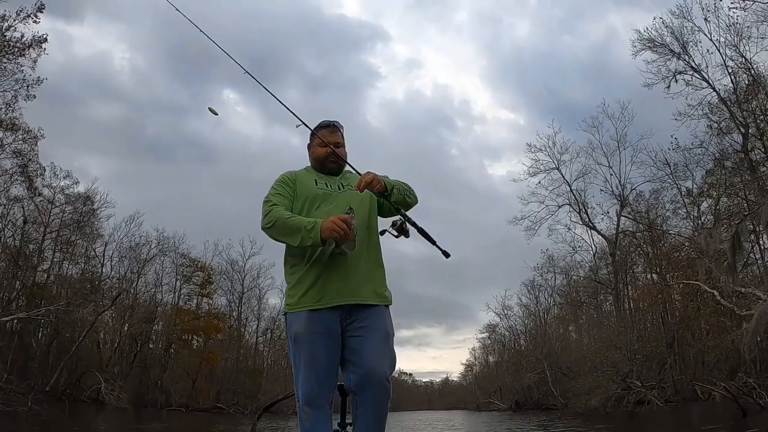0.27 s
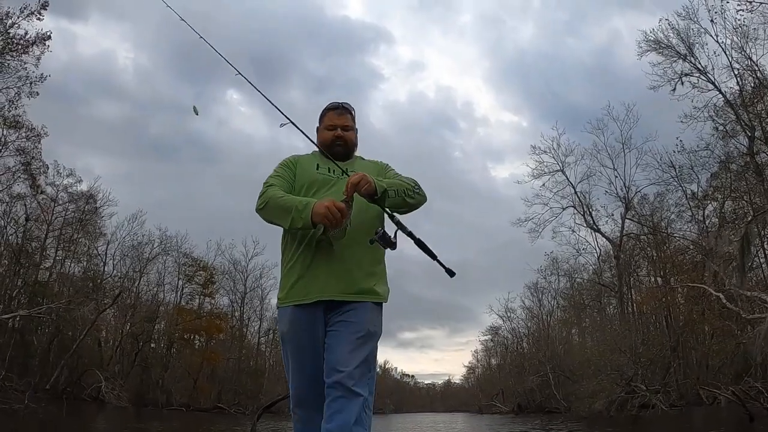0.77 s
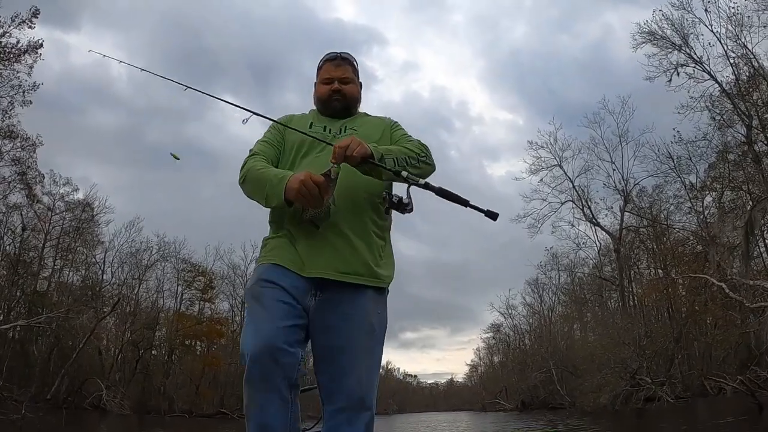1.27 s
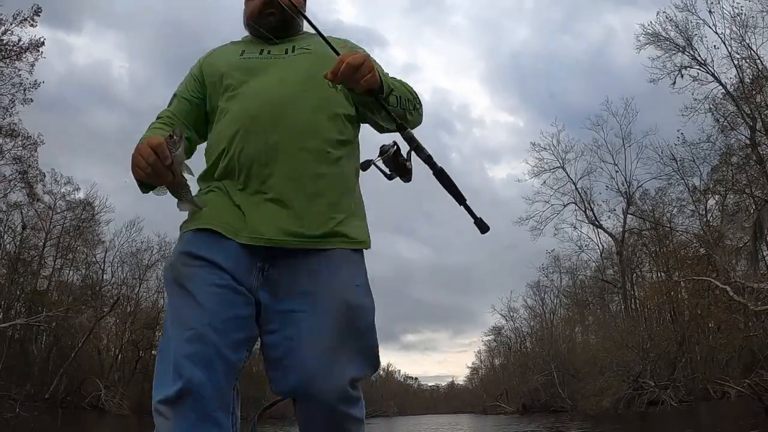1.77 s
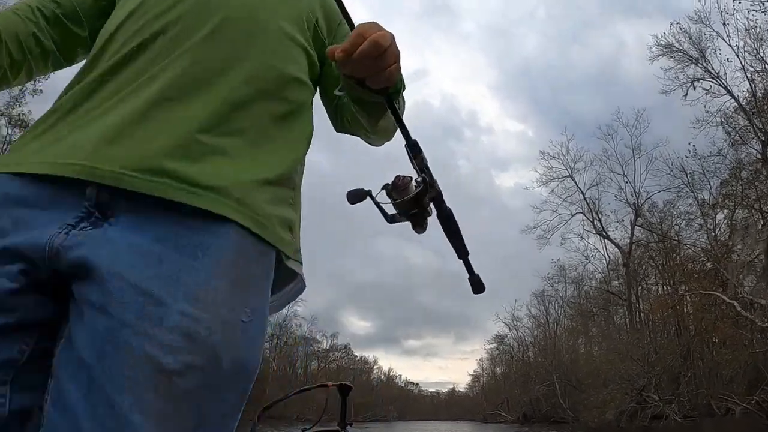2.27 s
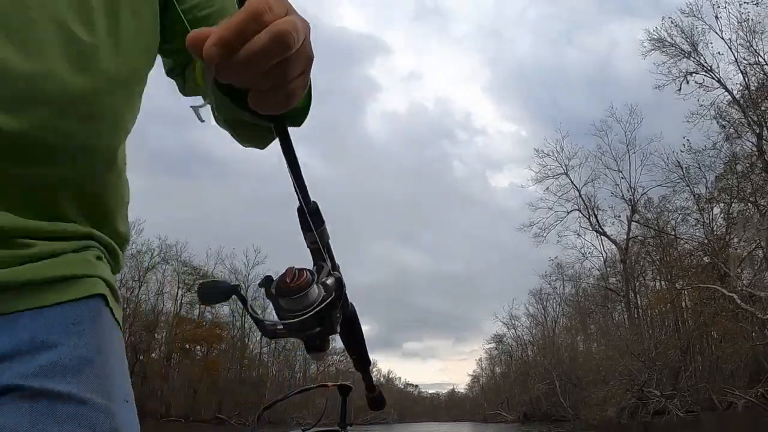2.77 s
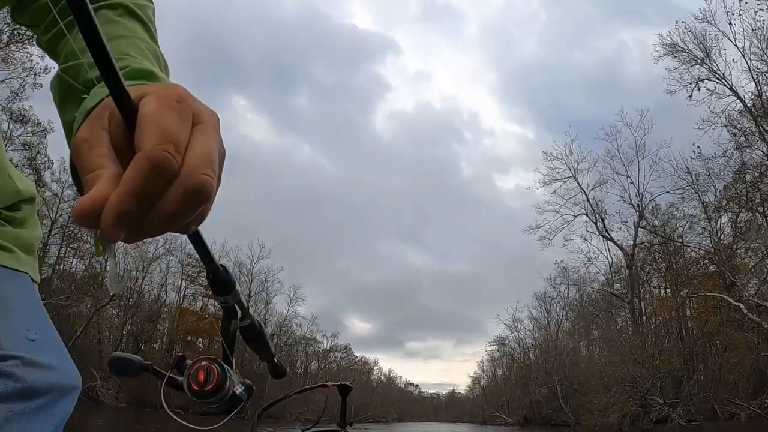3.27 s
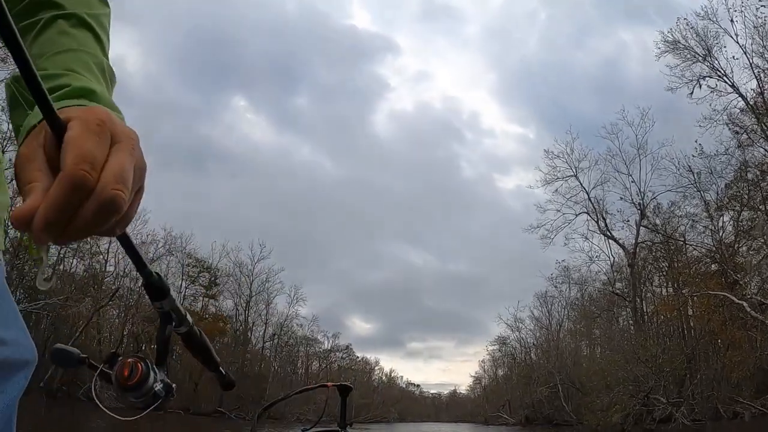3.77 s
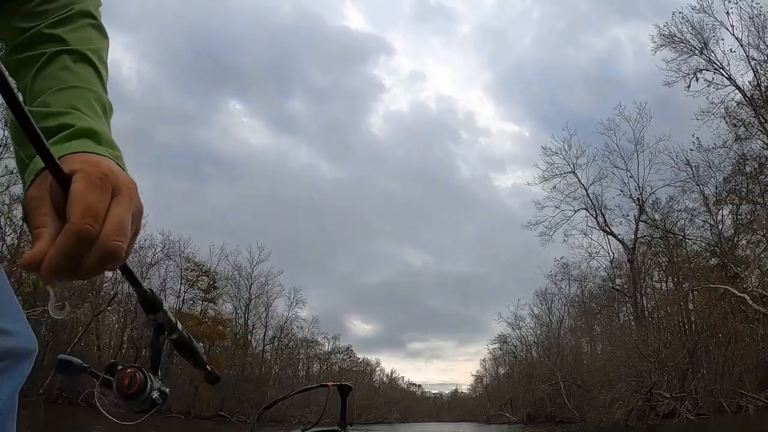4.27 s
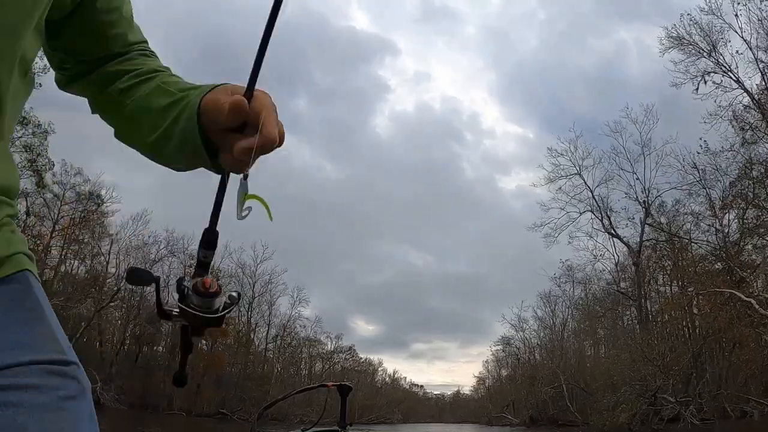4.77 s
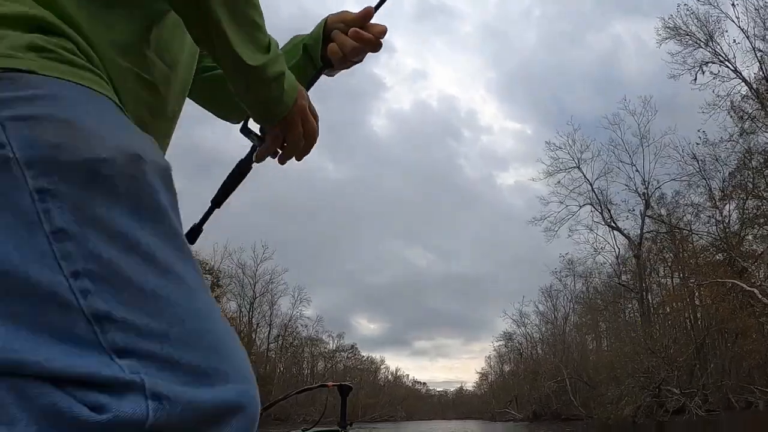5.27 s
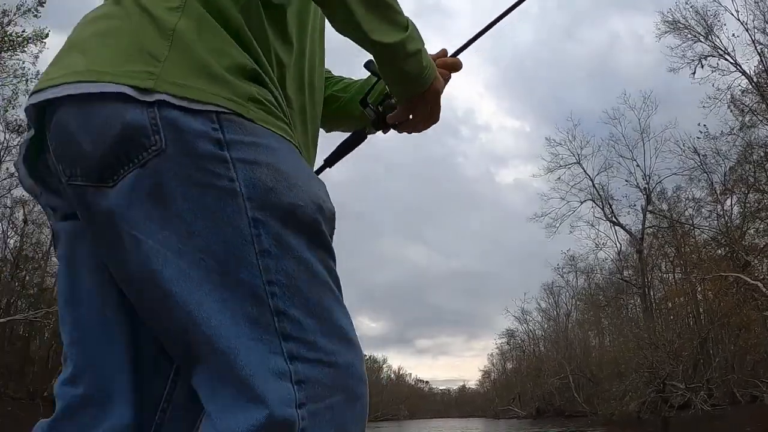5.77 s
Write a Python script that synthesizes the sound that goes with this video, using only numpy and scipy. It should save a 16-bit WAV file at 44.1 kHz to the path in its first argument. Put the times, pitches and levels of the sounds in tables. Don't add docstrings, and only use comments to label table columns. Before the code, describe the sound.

A nearly quiet start with faint hiss and soft left-leaning wind rumble gives way to dull, low footfalls on a hollow boat hull, with small clinks. Sharper lid knocks follow on the left, then a crowded run of thuds, scrapes, metallic ticks and boxy rattles from fishing gear. It thins into separate knocks and a final sharp clack. Close, dry stereo microphone on deck, open air, clothing rustling.

```python
import sys
import numpy as np
from scipy import signal
from scipy.fft import rfft, irfft, next_fast_len
from scipy.io import wavfile
from scipy.ndimage import uniform_filter1d, map_coordinates

SR = 44100
rng = np.random.default_rng(int(sys.argv[2]) if len(sys.argv) > 2 else 0)


def wav_out(sig):
    wavfile.write(sys.argv[1], SR, np.round(np.clip(np.atleast_2d(sig).T, -1, 1) * 32767).astype(np.int16))


def convert_level_to_amplitude(level_db):
    exponent = np.asarray(level_db, float) / 20
    return 10 ** exponent


N = 265349

# (t/s, peak level/dB, f/Hz, t60/s)
FOOTFALLS = [(0.337, -36, 50.2, 0.085), (0.934, -35.5, 46.24, 0.3), (0.973, -36, 35.1, 0.148),
             (1.044, -23.5, 105.2, 0.136), (1.1, -29, 76, 0.103), (1.769, -28, 32.7, 0.167),
             (1.921, -38, 45.9, 0.112), (2.456, -17.5, 49.7, 0.0445), (2.483, -19, 39.9, 0.106),
             (2.854, -17.5, 86.7, 0.157), (2.885, -22.5, 73.4, 0.139), (2.97, -32, 84.86, 0.142),
             (3.338, -29.5, 90.5, 0.225), (3.4365, -22, 71.7, 0.0602), (4.245, -37, 40.6, 0.266),
             (4.441, -13.5, 100, 0.085), (4.496, -30, 123.4, 0.12), (5.048, -35.5, 106.6, 0.075),
             (5.131, -32.5, 128.8, 0.047), (5.165, -33, 110, 0.13), (5.292, -31, 175.9, 0.4),
             (5.334, -27, 121.4, 0.37), (5.411, -26, 111.6, 0.092), (5.794, -37.5, 111.5, 0.134),
             (5.938, -28.5, 165.6, 0.044)]
# (t/s, peak level/dB, f/Hz, t60/s)
LID_KNOCKS = [(0.42, -46.5, 140.5, 0.26), (1.044, -31.5, 185.7, 0.172), (1.759, -29.5, 181.6, 0.037),
              (2.377, -24.5, 192.2, 0.168), (2.852, -25.5, 296.5, 0.07), (3.337, -19.5, 385.5, 0.0483),
              (3.3448, -20.5, 382.4, 0.078), (3.4335, -20.5, 180.7, 0.2), (3.436, -26, 389, 0.113),
              (3.511, -34.5, 261.3, 0.133), (3.704, -39, 193.5, 0.126), (3.766, -41, 375, 0.235),
              (4.208, -37.5, 176, 0.081), (4.2797, -20, 290, 0.06), (4.294, -24.5, 238, 0.041),
              (4.348, -26, 242.2, 0.167), (4.361, -14.5, 274.3, 0.083), (4.378, -28, 243.8, 0.203),
              (4.409, -23.5, 258.7, 0.0685), (4.4445, -17, 230, 0.0377), (4.459, -21.5, 329.4, 0.0697),
              (4.727, -30.5, 222.7, 0.104), (4.7765, -21, 190, 0.0303), (4.837, -22, 400, 0.05),
              (4.915, -36.5, 221.3, 0.234), (5.2945, -17, 185, 0.033), (5.349, -16, 191.5, 0.05),
              (5.219, -37, 170, 0.051), (5.413, -20, 292.5, .07), (5.4125, -22, 479, 0.11),
              (5.922, -28, 200.5, 0.152), (5.95, -31.5, 380.3, 0.147)]


def hull():
    thumps = panel(FOOTFALLS, cycles=0.267, sag=0.049, rattle_db=-10.0, spread=0.88)
    return thumps + panel(LID_KNOCKS, cycles=0.38, sag=0.0766, rattle_db=-10, spread=0.801)


def panel(rows, cycles, sag, rattle_db, spread):
    out, size = np.zeros((2, N + SR)), 12288
    t = np.arange(size) / SR
    sagging_t = t + sag * 0.01 * (1 - np.exp(-t / 0.0864))
    for s, db, hz, t60 in rows:
        rise = cycles / hz
        ring = swell(t, rise, t60) * np.sin(2 * np.pi * hz * sagging_t)
        crowd = rush(lambda f: np.exp(-(np.log((f + 1) / (0.9276 * hz)) / spread) ** 2), size)
        tail = convert_level_to_amplitude(rattle_db) * swell(t, rise, 1.8 * t60) * crowd
        out[:, round(s * SR):][:, :size] += convert_level_to_amplitude(db) * (ring + tail)
    return out[:, :N]


# (t/s, peak level/dB, ring f/Hz, treble level/dB, t60/s)
STEP_TAPS = [(0.169, -57, 1715, -35.5, 0.0092), (1.046, -26.5, 1025, -30, 0.0446),
             (1.138, -53, 3538, -13, 0.148), (1.204, -45, 1192, -21, 0.048), (1.346, -51, 3560, -9, 0.082),
             (1.42, -36.5, 3610, -5.5, 0.074), (1.736, -47.5, 1316, -43.5, 0.25),
             (1.757, -22.5, 1135, -18, 0.054), (1.907, -32.5, 1708, -17, 0.0513),
             (2.069, -42, 999.5, -11, 0.125), (2.235, -45, 3576, -5.5, 0.093),
             (2.388, -27.5, 1796, -23.5, 0.0777), (2.431, -38, 902.6, -7, 0.11),
             (2.493, -41, 952.6, -35.5, 0.08)]
LATCH_TAPS = [(2.851, -30.5, 715, -21, 0.103), (2.887, -30, 753, -26, 0.0632),
              (2.953, -47, 7060, -5, 0.215), (3.119, -49, 2143, -23, 0.079),
              (3.337, -30.5, 1800, -23, 0.08), (3.434, -31.5, 1449, -19, 0.1466),
              (3.51, -33, 1784, -24, 0.12), (3.786, -34, 4160, 2.5, 0.0553), (4.102, -48, 2140, -16, 0.063),
              (4.214, -32.5, 2157, -16.5, 0.057), (4.278, -17.5, 1150, -23, 0.065),
              (4.3, -24, 2664, -11.5, 0.042), (4.32, -26.5, 2780, -18, 0.067),
              (4.358, -23, 849.4, -12.5, 0.112), (4.406, -31, 1719, -24.5, 0.099),
              (4.437, -19.5, 1714, -19, 0.0975), (4.444, -24.5, 1216, -14.5, 0.065),
              (4.502, -37.5, 936, -3, 0.094)]
REEL_TAPS = [(4.617, -25, 2384, -19.5, 0.0916), (4.639, -29, 1917, -12, 0.05),
             (4.728, -18, 921.5, -24, 0.035), (4.76, -22.5, 770.5, -23, 0.125),
             (4.772, -20, 3159, -18.5, 0.03), (4.784, -18.5, 1174, -12, 0.07),
             (4.837, -18, 703, -17, 0.0475), (4.861, -38.5, 4370, -17.5, 0.017),
             (4.886, -22, 3010, -15.5, 0.028), (4.937, -32, 1276, -11.5, 0.095),
             (4.967, -29, 2274, -12, 0.0383), (5.067, -41, 2152, -9, 0.033), (5.181, -33, 1000, -24, 0.112),
             (5.286, -34, 2510, -31, 0.082), (5.293, -30.5, 917, -15.5, 0.065),
             (5.351, -25, 952, -14.5, 0.0746), (5.413, -22.5, 917, -28, 0.059),
             (5.473, -38, 929, -28.5, 0.092), (5.513, -32, 1900, -28, 0.06),
             (5.555, -25.5, 1556, -30, 0.053), (5.9225, -20, 1236, -22.5, 0.0458)]
# (t/s, peak level/dB, ring f/Hz, treble level/dB, t60/s)
SHORT_SCRAPES = [(0.031, -58, 3790, -3, 0.043), (.409, -49.5, 1056, -13, 0.19), (.584, -58, 743, -5, 0.112),
                 (1.03, -36, 1182, -39.5, 0.114), (1.626, -41.5, 1350, -10.5, 0.132),
                 (2.93, -49, 701, 1.5, 0.31), (3.685, -44.5, 1025, -4, 0.159),
                 (4.202, -34, 1030, -0.5, 0.11), (4.232, -38, 2150, -8.5, 0.09),
                 (4.312, -29, 948, -41.5, 0.0243), (4.848, -31, 693, -1, 0.097),
                 (4.871, -28, 3230, -9, 0.11), (5.225, -41, 953, -4, 0.086), (5.321, -36.5, 914, -11, 0.06),
                 (5.394, -29.5, 4587, -3, 0.084), (5.571, -41, 922, -4, 0.082),
                 (5.731, -39.5, 2956, -18.5, 0.065)]
# (t/s, peak level/dB, ring f/Hz, treble level/dB, t60/s)
SLOW_SLIDES = [
    (2.344, -40, 1062, -9.5, 0.47),
    (3.598, -44, 2310, -8, 0.185),
    (3.764, -36, 1966, -11.5, 0.0826),
    (4.343, -24, 791, -20.5, 0.1265),
    (5.894, -38.5, 1231, -14.5, 0.155),
]


def tackle():
    struck = [(*row, 0.001) for row in STEP_TAPS + LATCH_TAPS + REEL_TAPS]
    rubbed = [(*row, 0.00805) for row in SHORT_SCRAPES] + [(*row, 0.0334) for row in SLOW_SLIDES]
    taps = contacts(struck, ring_db=-1.5, crack_db=-6.5, lead_s=0.00536)
    scrapes = contacts(rubbed, ring_db=-8.0, crack_db=-27.5, lead_s=0.00647)
    grain = convert_level_to_amplitude(0.64 * wobble(400) + 1.9 * wobble(1500))
    return crumbly((taps + scrapes) * grain, depth_db=2.0)


# (f/Hz, level/dB)
SPLINTER_BODY = [(240, -22.5), (400, -1), (469, 5.5), (531, -5.5), (1200, -9.5), (1340, -6.5), (1460, -9.5),
                 (4040, -14), (6000, -45.5), (7800, -60), (13200, -120)]
# (f/Hz, level/dB)
TREBLE_EDGE = [(1760, -8.5), (3000, -5), (4030, -3), (5130, -5.5), (10100, -18.5), (13000, -28.5),
               (15600, -37.5)]


def contacts(rows, ring_db, crack_db, lead_s):
    out, size = np.zeros((2, N + SR)), 8192
    t = np.arange(size) / SR - 0.025
    after = np.maximum(t, 0)
    approach = convert_level_to_amplitude(-6.0) * np.exp(-abs(t) / lead_s)
    crack = convert_level_to_amplitude(crack_db) * swell(after, 0.00065, 0.00477)

    for s, db, hz, treble_db, t60, rise in rows:
        def around(f):
            slope = np.where(f < hz, 7, 2.5)
            return convert_level_to_amplitude(along(SPLINTER_BODY, f) - slope * np.log2((f + 1) / hz) ** 2)

        ring_t60 = 1.33 * t60 * min(1, 1600 / hz)
        ring = convert_level_to_amplitude(ring_db) * swell(after, 0.24 * rise, ring_t60) * np.sin(2 * np.pi * hz * after)
        splinters = rush(around, size)
        dull = uniform_filter1d(splinters, size=20, axis=1)
        body = swell(after, rise, t60) * splinters + convert_level_to_amplitude(-11.5) * swell(after, 0.0091, 2.56 * t60) * dull
        edge_shape = swell(after, rise, 0.978 * t60) + approach + crack
        edge = edge_shape * rush(lambda f: convert_level_to_amplitude(along(TREBLE_EDGE, f)), size)
        hit = ring + body + convert_level_to_amplitude(treble_db + 6) * edge
        out[:, round((s + t[0]) * SR):][:, :size] += convert_level_to_amplitude(db - 10.5) * hit
    return out[:, :N]


# (f/Hz, level/dB, t60/s)
BOX_MODES = [
    (479, -14.5, 0.131),
    (922.7, -17.5, 0.142),
    (1556, -31, .06),
]


def box(rows):
    jolts, t = np.zeros(N), np.arange(SR // 4) / SR
    for s, db, *_ in rows:
        jolts[round(s * SR)] = convert_level_to_amplitude(0.627 * (db + 23) - 27)
    ring = sum(convert_level_to_amplitude(db) * swell(t, 1 / hz, t60) * np.sin(2 * np.pi * hz * t) for hz, db, t60 in BOX_MODES)
    return signal.fftconvolve(jolts, ring)[:N]


# (t/s, peak level/dB, f/Hz, t60/s)
LOW_NOTES = [(1.045, -35.5, 751, 0.088), (3.12, -43, 690, 0.09), (3.34, -24, 500, 0.06),
             (4.281, -27, 1008, 0.08), (4.409, -25, 486, 0.056), (4.732, -26, 936.4, 0.06),
             (4.837, -23.5, 891, 0.033), (4.989, -39.5, 946, 0.064), (5.056, -41, 892.5, 0.064),
             (5.126, -40, 508, 0.0246), (5.182, -50, 984, 0.071), (5.414, -29, 921, 0.054),
             (5.922, -27.5, 759.5, 0.107), (1.91, -34, 2023, 0.0262), (1.752, -31.5, 1509, 0.024),
             (1.884, -47, 1180, 0.05), (3.705, -46, 1095, 0.0275), (3.436, -35, 1629, 0.042),
             (3.225, -52, 480, .06), (5.556, -32, 1556, .05),
             (0.1206, -59, 1325, 0.04), (0.168, -55.5, 1695, 0.036), (0.321, -55.5, 1372, 0.049),
              (1.046, -36, 1556, 0.093), (1.2278, -52, 2233, 0.036), (1.91, -29, 1650, 0.035),
              (2.0688, -45.5, 1884, 0.024), (3.1198, -48, 2115, 0.04), (3.4325, -23.5, 1450, 0.04),
              (4.2274, -35, 2160, 0.054), (4.355, -23.5, 1677, 0.047), (4.4034, -29.5, 1247, 0.043),
              (4.6215, -32, 1394, 0.047), (4.7845, -22, 1100, 0.03), (4.9686, -40, 1296, 0.043),
              (5.1811, -37.5, 1939, 0.06), (5.9216, -14, 1453, 0.011)]
# (t/s, peak level/dB, f/Hz, t60/s)
HIGH_TICKS = [(1.427, -44.5, 2570, 0.047), (4.2351, -46, 4460, 0.029), (4.3009, -24, 2576, .025),
              (4.3025, -20, 4222, 0.0312), (4.4058, -42, 3230, 0.025), (4.6393, -34.5, 3830, 0.029),
              (4.7731, -29, 3100, 0.024), (4.8614, -24, 4480, 0.02), (4.8865, -20, 3210, 0.039),
              (4.9657, -34, 3395, 0.035), (5.286, -41.5, 2504, .025), (5.397, -40.5, 4670, 0.027),
              (5.411, -27, 2730, 0.05), (5.8257, -44, 3540, 0.019), (5.9214, -24.5, 2626, 0.0122),
              (2.9552, -30.5, 7116, 0.0307), (3.787, -23.5, 4310, 0.026), (4.2135, -44, 4700, 0.028),
              (1.4205, -38, 4600, .03), (4.786, -26, 4800, .015), (4.6225, -30, 3000, .015)]
# (t/s, peak level/dB, centre f/Hz, t60/s)
DRY_SNAPS = [(.056, -63, 9020, 0.054), (.108, -59, 2900, 0.0118), (.1476, -68.5, 9000, .015),
             (.318, -66.5, 8450, 0.051), (.6355, -76, 11000, 0.019), (1.1378, -52.5, 4176, 0.0174),
             (1.3463, -43, 4600, 0.021), (1.4197, -30, 5178, 0.0185), (1.759, -36.5, 4330, 0.021),
             (1.846, -54, 4520, .03), (2.835, -52, 2920, 0.0167), (2.8499, -51, 5360, 0.0143),
             (2.8848, -38, 3300, 0.025), (2.9552, -37.5, 7830, 0.0156), (2.985, -46.5, 7000, .015),
             (3.0803, -54, 3780, 0.0143), (3.2569, -53, 3380, 0.031), (3.2837, -52.5, 4190, 0.0128),
             (4.3207, -32, 2900, 0.018), (4.348, -30.5, 2790, 0.032), (4.361, -29.5, 4550, 0.014),
             (4.391, -40, 1900, .015), (4.5038, -39, 6600, 0.0157), (4.8507, -38, 4385, 0.014),
             (4.861, -27.5, 6930, 0.019), (4.9376, -34.5, 4210, .02), (5.008, -50, 3600, 0.0136),
             (5.063, -41, 3080, 0.096), (5.217, -43.5, 3670, 0.017), (5.286, -47, 5230, 0.0145),
             (1.52, -50.5, 3007, 0.013), (2.145, -47, 1010, .02), (3.338, -34, 1127, 0.114),
             (3.436, -36, 1537, 0.075), (5.9215, -27, 2053, 0.0071), (5.931, -29.5, 1111, 0.119),
             (5.294, -31, 595, 0.038), (5.352, -28.5, 631, 0.041), (4.784, -28.5, 1970, 0.0144),
             (1.43, -48.5, 1008, 0.084), (3.79, -38.5, 1580, 0.068), (1.196, -51.5, 2340, 0.039)]


def small_parts():
    low = fittings(LOW_NOTES, spread=0.166, fuzz_db=-9)
    high = fittings(HIGH_TICKS, spread=0.277, fuzz_db=-6)
    return low + high + fittings(DRY_SNAPS, spread=0.424, fuzz_db=7.0)


def fittings(rows, spread, fuzz_db):
    out, size = np.zeros((2, N + SR)), 4096
    t = np.arange(size) / SR
    for s, db, hz, t60 in rows:
        fuzz = rush(lambda f: np.exp(-(np.log((f + 1) / hz) / spread) ** 2), size)
        note = np.sin(2 * np.pi * hz * t)
        blend = (note + convert_level_to_amplitude(fuzz_db) * fuzz) / np.hypot(1, convert_level_to_amplitude(fuzz_db))
        out[:, round(s * SR):][:, :size] += convert_level_to_amplitude(db - 5.5) * swell(t, 0.000626, t60) * blend
    return out[:, :N]


# (t/s, peak level/dB, time to lose 10 dB/s, fizz over scuff level/dB)
STROKES = [(.5, -71.5, 0.1023, -3), (1.1, -66.5, 0.0853, -10), (1.81, -54.5, 0.1393, -10),
           (2.297, -58, 0.0612, -19), (2.46, -58, 0.1379, -9), (2.75, -88.5, 2, -9.5),
           (2.99, -65.5, 0.2619, 2.5), (3.421, -52, 0.0167, -20), (3.57, -59, -0.0448, -16),
           (3.741, -50.5, 0.0292, -9.5), (4.0, -74.5, 0.7752, 6), (4.32, -43.5, 0.0647, -13.5),
           (4.471, -38.5, 0.0041, -19.5), (4.64, -85.5, -0.43, -34.5), (4.813, -39.5, 0.1157, -16.5),
           (4.952, -41.5, -0.0024, -16), (5.27, -54.5, 0.0858, -4), (5.46, -49, 0.1314, -6.5),
           (5.771, -53.5, 0.05, -4.5), (5.99, -69.5, -1, -16)]
# (f/Hz, level/dB)
SCUFF_SPECTRUM = [(210, -5.5), (350, -1.5), (481, -5), (809, -15.5), (981, -9), (1090, -11.5),
                  (1910, -14.5), (3500, -17.5), (4550, -28.5), (7700, -120)]
# (f/Hz, level/dB)
FIZZ_SPECTRUM = [(1060, -53.5), (1800, -6), (2340, -10), (2960, -9), (4480, -9), (4860, -10), (8580, -17),
                 (12700, -29), (15600, -44.5)]


def rustle():
    scuff = surges([row[:3] for row in STROKES], calm_db=-76.5, fall=1.0)
    fizz = surges([(s, db + fizz_db, span) for s, db, span, fizz_db in STROKES], calm_db=-82, fall=1.397)
    grain = 1.2 * wobble(40) + 1.5 * wobble(250)
    scuffing = scuff * convert_level_to_amplitude(grain) * bed(SCUFF_SPECTRUM)
    fizzing = fizz * convert_level_to_amplitude(grain + 0.62 * wobble(900)) * bed(FIZZ_SPECTRUM)
    return crumbly(scuffing + fizzing, depth_db=1.5)


# (t/s, peak level/dB, f/Hz, t60/s)
WIND_LUMPS = [(.015, -52, 45.7, 0.079), (.11, -51, 49.2, 0.079), (.18, -46.5, 39.7, 0.107),
              (.262, -40, 44.4, 0.091), (.635, -40, 54.9, 0.092), (.685, -47, 39.5, 0.127),
              (1.045, -36.5, 45, 0.156), (1.315, -39, 38.8, 0.114), (2.315, -40, 49.1, 0.14),
              (3.93, -40.5, 35.4, 0.196), (5.41, -42.5, 36, 0.115), (5.715, -44.5, 40, 0.132),
              (5.945, -33.5, 40.5, 0.15)]


def buffets():
    return lean() * panel(WIND_LUMPS, cycles=0.35, sag=.03, rattle_db=-11.0, spread=0.58)


# (t/s, peak level/dB, time to lose 10 dB/s)
HULL_ROCKS = [(.27, -55.5, -0.26), (.42, -65.5, 0.21), (.75, -61.5, 0.23), (1.0, -48, 0.08),
              (1.17, -41, 0.0718), (1.85, -41, 0.1439), (2.33, -54, 0.03), (2.58, -40, 0.1641),
              (3.15, -56.5, 0.35), (3.3, -51.5, 0.16), (3.97, -50, -0.01), (4.27, -51, 0.15),
              (5.03, -48.5, -0.0236), (5.53, -56, -0.1), (5.8, -49, 0.17), (6.02, -33, 0.0023)]
# (t/s, peak level/dB, time to lose 10 dB/s)
PLATE_SHUDDERS = [(0, -68.5, 0.07), (.47, -57, 0.1155), (1.0, -62.5, 0.47), (1.78, -38.5, 0.0625),
                  (2.42, -36.5, 0.0928), (2.9, -68.5, 1.11), (3.55, -53.5, 0.1542), (4.13, -65, 0.68),
                  (4.7, -44, 0.1989), (5.35, -47, 0.23), (5.75, -69, -0.15), (6.02, -40, 0)]
# (f/Hz, level/dB)
SWAY_SPECTRUM = [(11, -49.5), (24, 0.5), (38, 13), (92, -0.5), (108, -9.5), (140, -1), (180, -71.5),
                 (310, -120)]
# (f/Hz, level/dB)
DRUM_SPECTRUM = [(41, -18), (70, -2.5), (102, -8.5), (243, -11), (291, -19.5), (428, -29), (529, -38.5),
                 (700, -30.5), (910, -44.5), (1540, -120)]


def rumble():
    gust = wobble(6.4)
    sway = convert_level_to_amplitude(3.11 * gust + 0.7 * np.array([wobble(4.9), wobble(6.0)])) * bed(SWAY_SPECTRUM)
    drum = convert_level_to_amplitude(0.59 * gust + 1.02 * wobble(25)) * bed(DRUM_SPECTRUM)
    swaying = surges(HULL_ROCKS, calm_db=-71.5, fall=0.874) * sway
    drumming = surges(PLATE_SHUDDERS, calm_db=-72.5, fall=1.16) * drum
    return lean() * (swaying + drumming)


def lean():
    t = np.arange(N) / SR
    return convert_level_to_amplitude(np.outer([1, -1], 0.7 + 4.5 / (1 + (t / 0.9) ** 8)))


# (f/Hz, level/dB)
HISS_SPECTRUM = [(120, -39.5), (200, -1), (299, -22.5), (339, -7.5), (690, -14.5), (1460, -5),
                 (1990, -14.5), (3020, -17), (5510, -19.5), (8690, -23.5), (15600, -71.5)]


def outdoor_hiss():
    return convert_level_to_amplitude(-72.5 + 2.21 * wobble(5.6)) * crumbly(bed(HISS_SPECTRUM), depth_db=2.0)


# (f/Hz, share/1)
SHADOW = [(60, 0.13), (250, 0.3364), (600, 1.1252), (1500, 1.5), (4000, 0.8445), (10000, 0.3)]
# (t/s, left-right level/dB)
ANGLER_PLACE = [
    (0, 2),
    (1.5, 1.5),
    (2.3, 2.5),
    (2.9, 4),
    (3.3, 7.5),
    (4.3, 7.5),
    (5.6, 6.5),
    (5.9, 2),
    (6.02, 1),
]


def placed(x):
    hz, t, z = signal.stft(x, SR, nperseg=512)
    lean_db = np.interp(t, *np.transpose(ANGLER_PLACE))
    delay = np.exp(-1j * np.pi * hz[:, None] * lean_db * 1.05e-5)
    side = convert_level_to_amplitude(along(SHADOW, hz)[:, None] * lean_db / 2) * delay
    z = z * np.array([side, 1 / side]) * 2 / (abs(side) + 1 / abs(side))
    return signal.istft(z, SR, nperseg=512)[1][:, :N]


def surges(rows, calm_db, fall):
    t = np.arange(N) / SR
    gain = convert_level_to_amplitude(calm_db)
    for s, db, span in rows:
        gain = gain + convert_level_to_amplitude(db - 10 * abs(t - s) / abs(span) / np.where(t > s, fall, 1))
    return gain


def swell(t, rise, t60):
    shape = (1 - np.exp(-t / abs(rise))) ** 2 * convert_level_to_amplitude(-60 * t / abs(t60))
    return shape / shape.max()


def crumbly(x, depth_db):
    z = signal.stft(x, nperseg=256, noverlap=192)[2]
    spots = uniform_filter1d(rng.standard_normal(z.shape[1:]), size=3, axis=0)
    spots = uniform_filter1d(spots, size=5, axis=1)
    return signal.istft(z * convert_level_to_amplitude(depth_db * unit(spots)), nperseg=256, noverlap=192)[1][:, :N]


def bed(spectrum):
    return rush(lambda hz: convert_level_to_amplitude(along(spectrum, hz)), next_fast_len(N))[:, :N]


# (f/Hz, correlation/1)
COHERENCE = [(30, 0.967), (80, 0.944), (300, 0.94), (700, 0.751), (1500, 0.518), (3000, 0.44),
             (7000, 0.042)]


def rush(gain, size):
    hz = np.fft.rfftfreq(size, 1 / SR)
    turn = np.arccos(np.clip(along(COHERENCE, hz), -1, 1)) / 2
    noise = rfft(rng.standard_normal((2, size)))
    mid, side = irfft(noise * gain(hz) * [np.cos(turn), np.sin(turn)], size)
    return unit(np.array([mid + side, mid - side]))


def wobble(rate):
    knots = rng.standard_normal(int(N * rate / SR) + 4)
    return map_coordinates(knots, [np.arange(N) * rate / SR])


def along(points, hz):
    f, v = np.transpose(points)
    return np.interp(np.log(hz + 1), np.log(f + 1), v)


def unit(x):
    return x / np.sqrt(np.mean(x ** 2) + 1e-20)


def scene():
    deck = hull() + tackle() + box(REEL_TAPS[:-1]) + small_parts() + rustle()
    return placed(deck) + buffets() + rumble() + outdoor_hiss()


def band_limit(x):
    return signal.sosfilt(signal.butter(12, 15720, fs=SR, output="sos"), x)


def record(dry):
    x = signal.sosfilt(signal.butter(2, 30, "high", fs=SR, output="sos"), dry)
    x = irfft(rfft(x) * (np.fft.rfftfreq(N, 1 / SR) < 15700), N)
    return band_limit(x)


dry = scene()
out = record(dry)
wav_out(out)
```